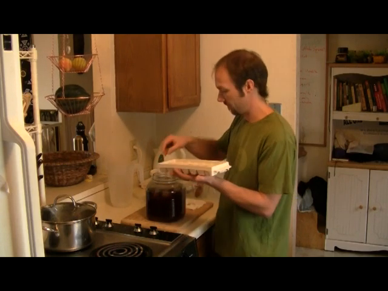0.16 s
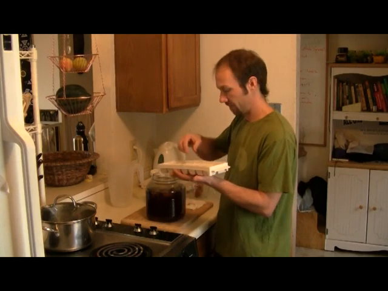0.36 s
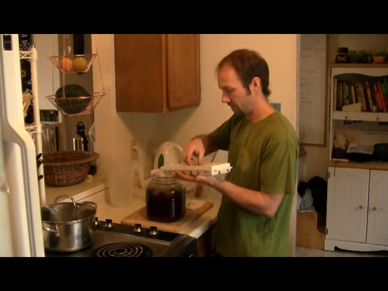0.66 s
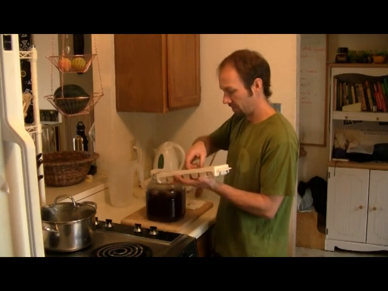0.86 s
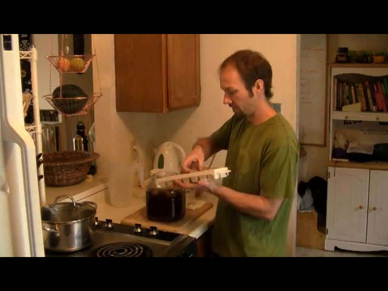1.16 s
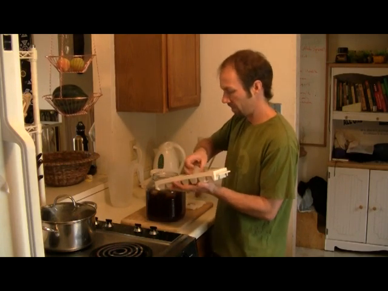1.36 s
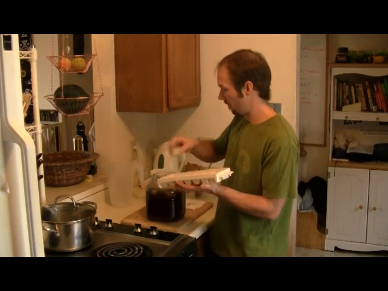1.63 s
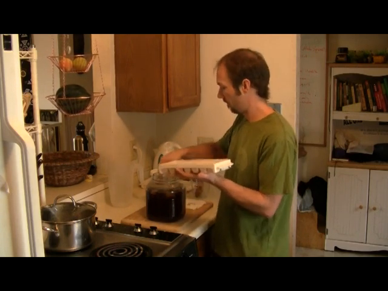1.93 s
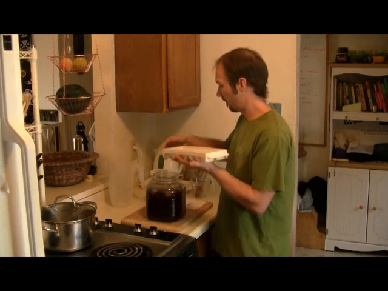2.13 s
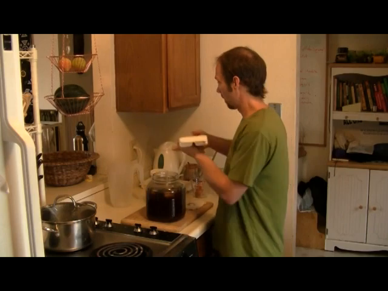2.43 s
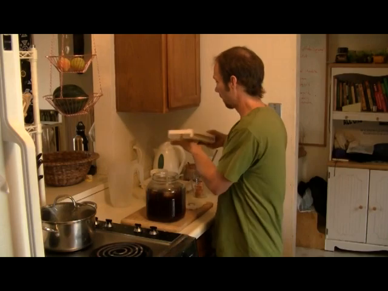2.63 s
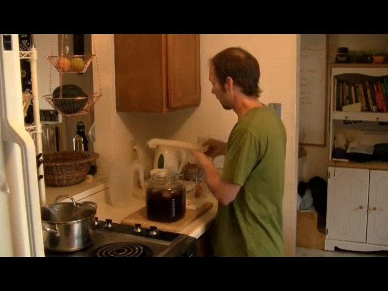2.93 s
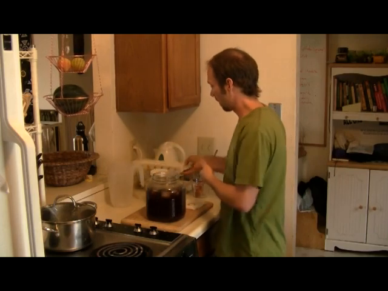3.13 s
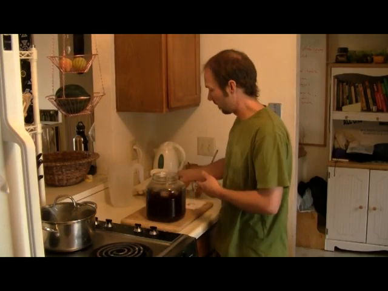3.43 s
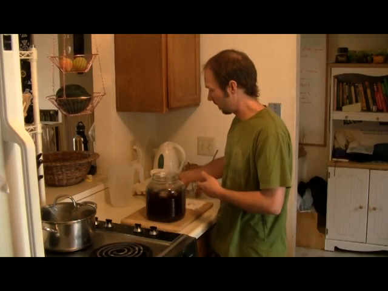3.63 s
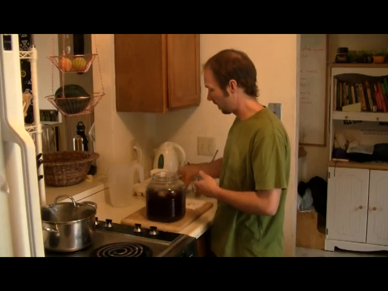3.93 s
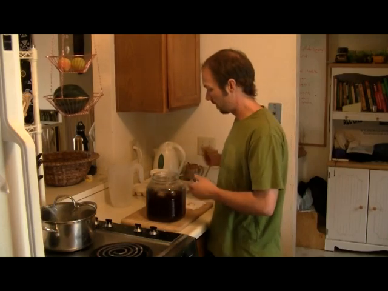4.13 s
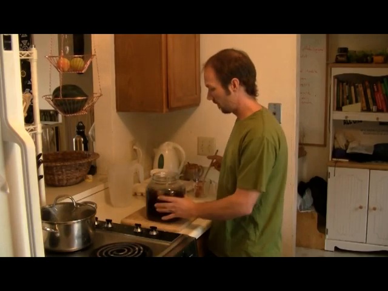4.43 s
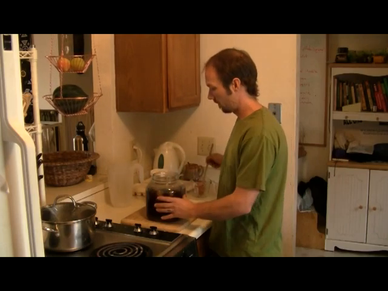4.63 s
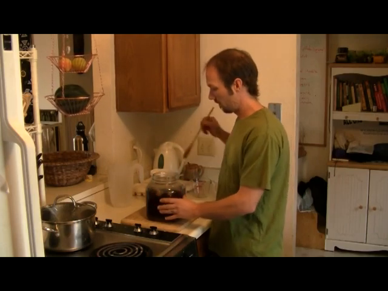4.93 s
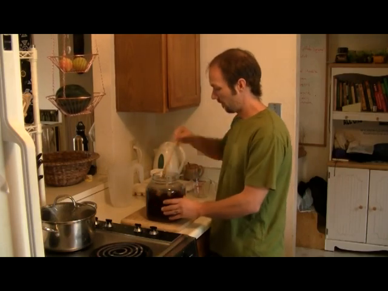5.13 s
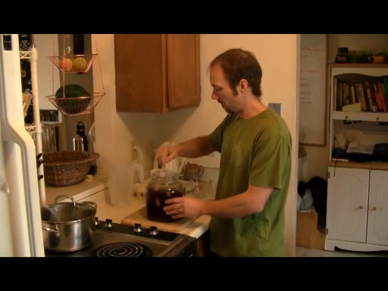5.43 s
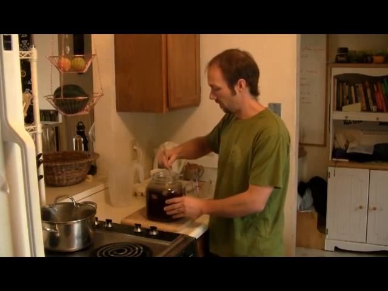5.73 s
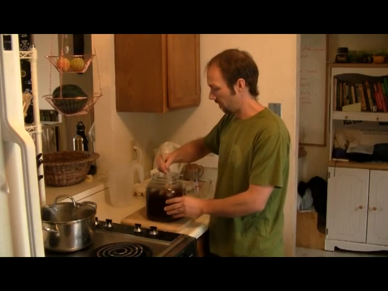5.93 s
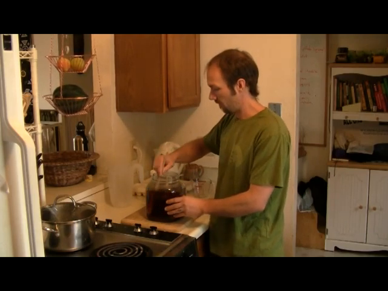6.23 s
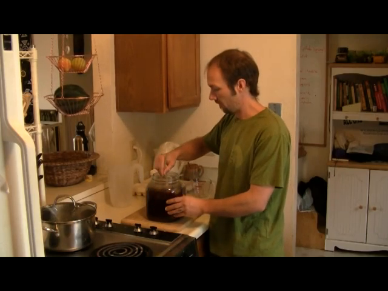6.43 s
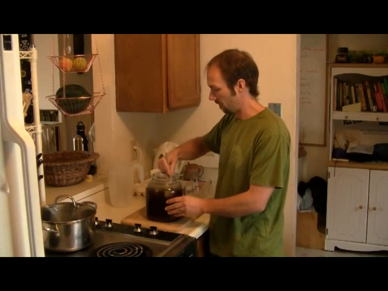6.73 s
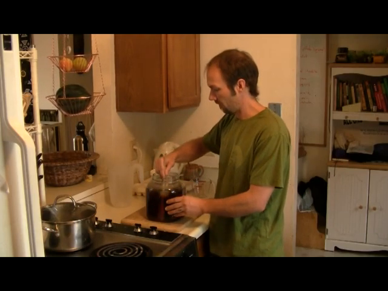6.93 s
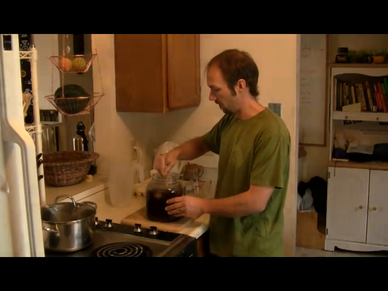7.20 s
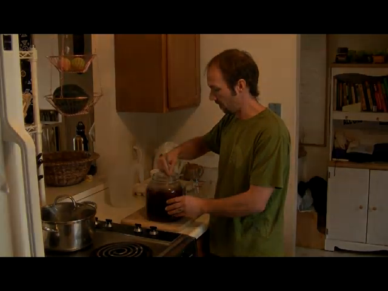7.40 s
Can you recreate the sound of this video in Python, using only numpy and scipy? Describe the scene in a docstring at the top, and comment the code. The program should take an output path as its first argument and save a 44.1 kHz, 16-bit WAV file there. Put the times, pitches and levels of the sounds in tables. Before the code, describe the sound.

A bright ice clink on glass opens, with a soft plop, followed by dry plastic cracking and scraping. A second cluster of cubes rings the jar, then small tinkles follow. The tray lands on the worktop with a sharp woody bang and several rattling knocks. Later, stirring brings a dense run of spoon and ice clinks, fading to faint taps. The microphone stands a few metres away in a hard, lively room with soft hum.

```python
"""Ice cubes drop into a big glass jar of drink, heard from across a small hard kitchen; later a spoon stirs them.
Jar: damped modes, struck by a blow plus tiny slips, with high ice modes and one bright ping per clink.
Before the stirring, cubes crack loose from a plastic tray and the tray clatters onto the counter (filtered
contact noise, board modes). Cubes splash dully. Every contact gets its own noise-built reverberation.
Behind it all: steady air noise and the sine lines of a faint appliance hum."""
import sys
import numpy as np
from scipy import signal
from scipy.fft import rfft, irfft, next_fast_len
from scipy.io import wavfile

SR = 44100
rng = np.random.default_rng(int(sys.argv[2]) if len(sys.argv) > 2 else 0)


def inscribe(sig):
    """Save sig as 16-bit PCM at rate SR to the path in sys.argv[1].

    A 1-D sig is mono; a 2-D sig holds one channel per row.
    Samples are clipped to [-1, 1] before scaling.
    """
    pcm = np.round(np.clip(np.atleast_2d(sig).T, -1, 1) * 32767)
    wavfile.write(sys.argv[1], SR, pcm.astype(np.int16))


N = 333528  # samples in the scene

SPAN = 27000  # samples in one contact with its tail
T = np.arange(SPAN) / SR  # s
SPAN_HZ = np.fft.rfftfreq(SPAN, 1 / SR)
HEAD = SR // 25  # samples in the 40 ms over which contact levels hold

# level bands low, body, ring, tick: lower edge f/Hz, upper edge f/Hz
BANDS = [(100, 600), (600, 1800), (1800, 4000), (4000, 13000)]
BAND_CENTRES_HZ = np.sqrt(np.prod(BANDS, axis=1))
# stereo width of reverberation and ringing: f/Hz, side gain/dB
WIDTH = [(60, -22.5), (200, -13), (400, -21), (700, -14.5), (1300, -16), (2300, -13), (4300, -10),
         (8000, -8), (12000, 0)]
# colour of a bare ice contact: f/Hz, gain/dB
ICE_COLOUR = [(40, -34.5), (120, -12), (400, -9.5), (850, -1.5), (1400, -0.5), (1850, -6.5), (2400, 4.5),
              (3500, 1), (5200, -3.5), (7000, -11), (9500, -18.5), (12000, -22), (14500, -40)]


def amp(db):
    """Decibels to gain."""
    return 10 ** (np.asarray(db) / 20)


def along(points, hz):
    """(f/Hz, value) points interpolated on a log frequency axis."""
    f, v = np.transpose(points)
    return np.interp(np.log(hz + 1), np.log(f + 1), v)


def fade(t, t60):
    """Exponential decay of 60 dB in t60 seconds."""
    return np.exp(-np.log(1000) * t / t60)


def coloured(x, points):
    """Minimum-phase filter through (f/Hz, gain/dB) points, made by folding the cepstrum."""
    cepstrum = irfft(np.log(amp(along(points, SPAN_HZ))))
    cepstrum[1:SPAN // 2] *= 2
    cepstrum[SPAN // 2 + 1:] = 0
    response = np.exp(rfft(cepstrum))
    return irfft(rfft(x) * response)


def through(x, response):
    """Convolution with a response, cut to SPAN."""
    return signal.fftconvolve(np.atleast_2d(x), np.atleast_2d(response), axes=1)[:, :SPAN]


def add(track, start_s, x):
    """Mix a short sound into a track at start_s."""
    part = track[:, max(round(start_s * SR), 0):][:, :SPAN]
    part += x[:, :part.shape[1]]


def grating(chatter_s, slips_hz=1100, slip_size=0.37, blow_fade_s=0.0043):
    """Contact force: one blow, then tiny random slips; a long scrape swells and has hardly any blow."""
    life_s = max(chatter_s, 1e-4)
    slips = (rng.random(SPAN) < slips_hz / SR) * rng.standard_normal(SPAN)
    swell = 1 - np.exp(-10 * T / life_s)
    force = slip_size * slips * np.exp(-T / life_s) * swell
    force[0] = np.exp(-life_s / blow_fade_s)
    return force / np.linalg.norm(force)


def clack(chatter_s, colour, room):
    """Unpitched part of a contact as the room returns it, mid energy 1."""
    x = coloured(through(grating(chatter_s), room), colour)
    return x / np.linalg.norm(x[0])


def touch(db, chatter_s, room, touch_db=-10):
    """Light first contact ahead of a blow of level db, weaker by touch_db."""
    # f/Hz, gain/dB
    touch_colour = [(60, -38), (400, -16.5), (1000, -3), (2400, 0.5), (5000, -10.5), (9000, -18),
                    (14500, -38)]
    x = clack(chatter_s, touch_colour, room)
    return amp(db + touch_db) * x / x[0, :HEAD].std()


def ringing(hz, db, t60, room, spread_db=1.5, rise_s=.003, wet_db=-6):
    """Damped modes and their echo, mid energy 1; each blow shares the energy out anew."""
    size = amp(db + spread_db * rng.standard_normal(len(hz)))
    phase = np.float32(2 * np.pi * rng.random((2, len(hz), 1)))
    angle = np.float32(2 * np.pi * hz[:, None] * T) + phase
    waves = np.sin(angle) * np.float32(fade(T, t60[:, None]))
    onset = 1 - np.exp(-T / rise_s)
    mid, side = np.einsum("m,cmt->ct", np.float32(size), waves) * onset
    direct = np.array([mid, coloured(side, WIDTH)])
    echo = through(mid * fade(T, .25), room)
    ring = direct + amp(wet_db) * echo
    return ring / np.linalg.norm(ring[0])


def glass(held, room, note_hz=0, favour_db=4, slosh=.002, held_sag_hz=12.5):
    """Jar modes: the struck spot favours one note, moving drink detunes each mode, hand and swirl flatten all."""
    # jar modes: free-standing f/Hz, free level/dB, held level/dB, t60/s
    jar_modes = [(837, -20.5, -5.5, 0.29), (903, -8, -10, 0.21), (1037, -1, -2.5, 0.37),
                 (1119, -14, -5.5, 0.25), (1234, -8, -7, 0.33), (1441, -12.5, -8.5, 0.71),
                 (1504, -4.5, -1, .46), (1695, -13.5, -11.5, 0.55), (2090, -13.5, -5, 0.38),
                 (2156, -3.5, -3, 0.4), (2327, -1.5, -1.5, .32), (2440, -1.5, 1.5, 0.2),
                 (2535, -9, 2, 0.15), (2605, -4.5, -9, 0.3), (2984, -8, -9, .29), (3170, -15, -8.5, .28),
                 (3400, -9.5, -12, .27), (3842, -10, -11.5, 0.29), (4270, -11.5, -10, 0.28),
                 (4310, -15, -10.5, .21), (4600, -14.5, -16, 0.24), (4850, -11.5, -18, 0.15),
                 (5030, -12, -10, .22), (5237, -12, -17, 0.19), (5510, -21, -22, 0.2),
                 (6050, -26, -11, 0.12)]
    free_hz, free_db, held_db, t60 = np.transpose(jar_modes)
    hz, db = (free_hz - held_sag_hz, held_db) if held else (free_hz, free_db)
    db = db + favour_db * np.exp(-((hz - note_hz) / 45) ** 2)
    detuned_hz = hz * (1 + slosh * rng.standard_normal(len(hz)))
    return ringing(detuned_hz, db, t60, room, wet_db=1.5)


def struck_note(hardness, hard_hz, soft_hz=1055, soft_below=-1.5):
    """Soft contacts (hardness in dB/octave) favour the jar's low note, hard ones a higher one."""
    return soft_hz if hardness < soft_below else hard_hz


def tinkle(room, low_hz=2800, high_hz=9500, t60=0.011, count=14):
    """Short, high modes of the ice lumps, drawn anew for each contact."""
    hz = low_hz * (high_hz / low_hz) ** rng.random(count)
    db = -10 * np.log10(hz / low_hz)
    return ringing(hz, db, np.full(count, t60), room, spread_db=2, rise_s=.001, wet_db=10.0)


def ping(hz, db, room, t60_at_3khz):
    """Brightest partial of a clink, at db over its first 40 ms; higher ones die sooner."""
    t60 = t60_at_3khz * np.sqrt(3000 / hz)
    x = ringing(np.array([hz]), 0, np.array([t60]), room, rise_s=.004, wet_db=-6)
    return amp(db) * x / x[0, :HEAD].std()


def ping_level(db, hardness, hz, ref_hz=3300, db_per_octave=-8.5):
    """Hard contacts ping more, and high pings are weaker."""
    return db + hardness + db_per_octave * np.log2(hz / ref_hz)


def band_levels(db, hardness, shape_db, pivot_hz=1690, low_reach_octaves=1.1):
    """Contact levels in BANDS: the material gives the shape, a harder blow tilts it towards the treble."""
    octaves = np.log2(BAND_CENTRES_HZ / pivot_hz)
    return db + np.asarray(shape_db) + hardness * np.maximum(octaves, -low_reach_octaves)


def weighted(x, levels_db, top_slope=0.2, count=2):
    """Hard contacts are bright, soft ones dull: filter the first 40 ms towards the given band levels."""
    filters = [signal.butter(4, band, "band", fs=SR, output="sos") for band in BANDS]
    for _ in range(count):
        now_db = [10 * np.log10(np.mean(signal.sosfilt(f, x[0, :HEAD]) ** 2)) for f in filters]
        gain_db = np.subtract(levels_db, now_db)
        # the slope carries on into the highest treble
        top_db = gain_db[-1] + np.clip(top_slope * (gain_db[-1] - gain_db[-2]), -8, 3)
        x = coloured(x, [*zip(BAND_CENTRES_HZ, gain_db), (12000, top_db)])
    return x


def dropped_ice(glass_db=9, tinkle_db=-8, ping_db=-6, ping_t60=0.27, touch_lead_s=.003, chatter_s=0.0039):
    """Cubes bump the free-standing jar, a light touch then the blow; it rings clearly."""
    # floating ice on glass: t/s, level/dB, hardness/(dB/octave), ping f/Hz
    cubes = [(0.069, -26.5, -0.2, 3386), (0.381, -39, 0.1, 5000), (0.548, -54, -5.5, 2154),
             (0.744, -48.5, 6, 5141), (2.029, -49.5, -3, 3440), (2.066, -33.5, -0.4, 2625),
             (2.126, -29.5, 3.5, 3417), (2.535, -43.5, -1.5, 2930), (2.659, -56.5, 1, 2799),
             (2.766, -48, -0.2, 3418), (2.836, -53.5, -3, 3424), (2.905, -54.5, -6, 2460),
             (3.182, -50, -1.8, 3042), (3.321, -47, -.5, 3180)]
    shape_db = [-26.5, -1, 0, -14.5]  # in BANDS
    out = np.zeros((2, N))
    for start_s, db, hardness, ping_hz in cubes:
        room = kitchen(near_db=-2.5, early_db=5.5)
        jar = glass(False, room, struck_note(hardness, hard_hz=2433))
        ring = amp(glass_db) * jar + amp(tinkle_db) * tinkle(room)
        hit = weighted(clack(chatter_s, ICE_COLOUR, room) + ring, band_levels(db, hardness, shape_db))
        clink = ping(ping_hz, ping_level(db, hardness, ping_hz) + ping_db, room, ping_t60)
        add(out, start_s, touch(db, chatter_s, room))
        add(out, start_s + touch_lead_s, hit + clink)
    return out


def plops(glass_db=-6, tinkle_db=-8, chatter_s=.006, note_hz=895):
    """A cube hits the drink with a dull splash that hardly rings the jar."""
    # splashes: t/s, level/dB
    splashes = [(0.001, -40.5), (1.96, -44)]
    shape_db = [-6, 5, -6.5, -12.5]  # in BANDS
    out = np.zeros((2, N))
    for start_s, db in splashes:
        room = kitchen(near_db=-2.5, early_db=-10.0)
        ring = amp(glass_db) * glass(False, room, note_hz) + amp(tinkle_db) * tinkle(room)
        splash = clack(chatter_s, ICE_COLOUR, room) + ring
        add(out, start_s, weighted(splash, band_levels(db, 0, shape_db)))
    return out


def stirring(glass_db=4.5, hand_t60=1.5, tinkle_db=-4, ping_db=-10, ping_t60=0.16, touch_lead_s=.003):
    """Spoon ticks on glass and drives ice against it; soft contacts last longer, the hand damps the ring a little."""
    # knocks, hard from spoon, soft from ice: t/s, level/dB, hardness/(dB/octave), ping f/Hz
    knocks = [(5.28, -30, -2, 3405), (5.385, -35.5, 3, 3440), (5.576, -39, 2, 4990),
              (5.62, -26.5, 4.5, 3402), (5.683, -29.5, 4, 5222), (5.769, -37, 4.5, 3164),
              (5.823, -43, -0.5, 3880), (5.848, -34.5, -2, 5090), (5.89, -42, 4.5, 6508),
              (5.995, -33.5, -1, 2950), (6.023, -33.5, -1, 2950), (6.069, -30, 0.5, 2980),
              (6.141, -42.5, 2, 3413), (6.189, -37.5, -2.5, 3370), (6.212, -35.5, 4.5, 3910),
              (6.253, -36.5, -0.5, 4150), (6.28, -31.5, -1.5, 2830), (6.412, -50.5, -6, 5130),
              (6.451, -43.5, 4, 5150), (6.488, -48, -6.3, 2955), (6.648, -48, -.5, 2307),
              (6.735, -50.5, -1, 3030), (6.785, -49.5, -9.5, 3700), (6.912, -49, -7, 2961),
              (6.985, -44, 4.5, 5540), (7.081, -49, -11, 4161), (7.099, -47, -1.5, 3844),
              (7.168, -50, 0, 3070), (7.234, -49, -4, 2960), (7.385, -61, -10, 3036),
              (7.513, -44, 5.5, 5243)]
    # colour of the bare contact: f/Hz, gain/dB
    steel_colour = [(40, -21), (120, -4.5), (400, -0.5), (850, 1.5), (1400, -3), (1850, -1), (2400, 3),
                    (3500, -6.5), (5200, -7), (7000, -7), (9500, -19), (12000, -23), (14500, -36.5)]
    # shape in BANDS: level/dB
    shape_db = [-17.5, 1, -1, -13.5]
    out = np.zeros((2, N))
    for start_s, db, hardness, ping_hz in knocks:
        room = kitchen(near_db=0.0, early_db=-4.5)
        chatter_s = 0.0046 * .5 ** (hardness / 4.6)  # halves per 4.6 dB/octave
        jar = glass(True, room, struck_note(hardness, hard_hz=2170)) * fade(T, hand_t60)
        ring = amp(glass_db) * jar + amp(tinkle_db) * tinkle(room, high_hz=11500)
        hit = weighted(clack(chatter_s, steel_colour, room) + ring, band_levels(db, hardness, shape_db))
        clink = ping(ping_hz, ping_level(db, hardness, ping_hz) + ping_db, room, ping_t60)
        add(out, start_s, touch(db, chatter_s, room))
        add(out, start_s + touch_lead_s, hit + clink)
    return out


def ice_tray(glass_db=-3):
    """The tray flexes, ice cracks and scrapes out of the plastic; the jar just below rings faintly along."""
    # cracks: t/s, level/dB, hardness/(dB/octave), chatter decay/s
    cracks = [(0.035, -44, -1.9, .003), (0.663, -44.5, -3.5, 0.0041), (0.943, -60, -1, .005),
              (1.026, -47, 0.5, .013), (1.0612, -45.5, 4.5, .0006), (1.122, -52, 2, .006),
              (1.144, -48.5, 3, .001), (1.164, -32, 1.9, .02), (1.243, -46, 2.1, .015),
              (1.359, -57, -0.5, .01), (1.438, -41.5, -4, .009), (1.493, -46.5, -1.5, .013),
              (3.143, -54.5, 0.9, .004)]
    # colour of the bare contact: f/Hz, gain/dB
    plastic_colour = [(35, -70), (60, -50.5), (453, -17.5), (700, -16.5), (1010, -7), (1300, -5.5),
                      (1490, 1.5), (2060, -7), (2360, -3), (2590, -5), (8170, -15), (11800, -20),
                      (14500, -36.5)]
    # shape in BANDS: level/dB
    shape_db = [-16, 0, -.5, -4]
    out = np.zeros((2, N))
    for start_s, db, hardness, chatter_s in cracks:
        room = kitchen(near_db=-3, early_db=-0.5, near_t60=0.024)
        crack = clack(chatter_s, plastic_colour, room) + amp(glass_db) * glass(False, room)
        add(out, start_s, weighted(crack, band_levels(db, hardness, shape_db)))
    return out


def counter(board_db=-11):
    """Broad, hollow knocks of plastic on the worktop; a slide wakes the board only gradually."""
    # landing and shifting: t/s, level/dB, hardness/(dB/octave), chatter decay/s
    landings = [(3.39, -44, 0, 0.031), (3.422, -17, 1, .0048), (3.462, -31, 0.1, 0.0023),
                (3.5197, -28.5, -2.5, .001), (3.704, -37.5, 0, 0.019), (3.852, -51.5, 0.4, 0.084),
                (3.927, -26, -1, .0033)]
    # modes of tray and board: f/Hz, level/dB, t60/s
    board_modes = [(163, -19.5, 0.43), (227.4, -13.5, 0.62), (407.6, -2, 0.28), (830, -0.5, 0.15),
                   (1118, -1, 0.27), (1196, -8, 0.25), (1515, -3.5, 0.23), (1685, -6, 0.26),
                   (1881, 1.5, 0.1), (2404, -5, 0.38)]
    # colour of the bare contact: f/Hz, gain/dB
    worktop_colour = [(30, -37.5), (70, -32.5), (120, -17), (230, -11.5), (320, -15), (430, -6.5), (850, 0),
                      (1500, 1), (2000, -7.5), (2700, -10), (3300, -14.5), (4400, -14.5), (6000, -21.5),
                      (9000, -19), (12000, -26), (14500, -43)]
    # shape in BANDS: level/dB
    shape_db = [-10, 3, -2.5, -10.5]
    out = np.zeros((2, N))
    for start_s, db, hardness, chatter_s in landings:
        room = kitchen(near_db=-1.5, early_db=6.0, near_t60=0.13)
        board = ringing(*np.transpose(board_modes), room, rise_s=max(chatter_s, 1e-3), wet_db=2)
        knock = clack(chatter_s, worktop_colour, room) + amp(board_db) * board
        add(out, start_s, weighted(knock, band_levels(db, hardness, shape_db)))
    return out


def kitchen(near_db, early_db, near_t60=0.021, early_t60=0.2, build_s=.004):
    """Mid and side response from one spot: close surfaces, a swell of walls, a long tail."""
    # tail decay: f/Hz, t60/s
    tail_t60 = [(100, 0.5), (300, .5), (1000, 0.44), (3000, 0.4), (7000, 0.28), (13000, 0.25)]
    hz, t, noise = signal.stft(rng.standard_normal((2, SPAN)), SR, nperseg=256)
    decay = fade(t, along(tail_t60, hz)[:, None]) + amp(early_db) * fade(t, early_t60)
    walls = signal.istft(noise * decay, SR, nperseg=256)[1][:, :SPAN]
    walls = walls * (1 - np.exp(-T / build_s))
    near = rng.standard_normal((2, SPAN)) * fade(T, near_t60)
    # treble beams straight across; the rest goes round by the walls
    near = coloured(near, [(1000, -8.5), (6000, -5.5)])
    mid, side = walls / np.linalg.norm(walls[0]) + amp(near_db) * near / np.linalg.norm(near[0])
    return np.array([mid, coloured(side, WIDTH)])


def room_tone():
    """Soft steady air noise, spectrally shaped, with the sine lines of an appliance hum in the middle."""
    # air spectrum: f/Hz, relative density/dB
    air_colour = [(15, -47), (25, -18), (92, -17.5), (108, -10.5), (141, -11), (234, -4.5), (290, -8),
                  (378, -3), (520, -6), (679, -6), (862, -8), (1820, -13), (3630, -21.5), (9990, -30.5),
                  (14500, -44.5)]
    # air noise, mid rms: t/s, level/dB
    air_level = [(0, -60.5), (4.7, -60.5), (6.9, -62), (7.35, -66), (7.56, -66.5)]
    # air width: f/Hz, side over mid/dB
    air_width = [(60, -2), (110, -3), (200, 4), (370, 6.5), (680, 6), (1260, 3), (2310, 0.5), (4250, -1.5),
                 (7810, -2.5), (14400, 2)]
    # hum lines: f/Hz, rms level/dB
    hum_lines = [(119, -79), (283, -79.5), (377, -84), (678, -72.5)]
    t, hz = np.arange(N) / SR, np.fft.rfftfreq(N, 1 / SR)
    spectrum = rfft(rng.standard_normal((2, N))) * amp(along(air_colour, hz))
    air = irfft(spectrum * [np.ones(len(hz)), amp(along(air_width, hz))], N)
    air *= amp(np.interp(t, *np.transpose(air_level))) / air[0].std()
    for f, db in hum_lines:
        air[0] += np.sqrt(2) * amp(db) * np.sin(2 * np.pi * (f * t + rng.random()))
    return air


def scene():
    """Sum all sources as mid and side, then turn into left and right."""
    mid, side = dropped_ice() + plops() + stirring() + ice_tray() + counter() + room_tone()
    return np.array([mid + side, mid - side])


def record(dry, top=.9, droop_db=-4, top_hz=14400):
    """Round off the highest peaks, droop the top treble, keep nothing above top_hz."""
    rounded = dry / (1 + (dry / top) ** 4) ** (1 / 4)
    size = next_fast_len(N + SPAN)
    hz = np.fft.rfftfreq(size, 1 / SR)
    response = amp(along([(11500, 0), (13500, droop_db)], hz)) * (hz < top_hz)
    return irfft(rfft(rounded, size) * response, size)[:, :N]


dry = scene()
out = record(dry)
inscribe(out)
```